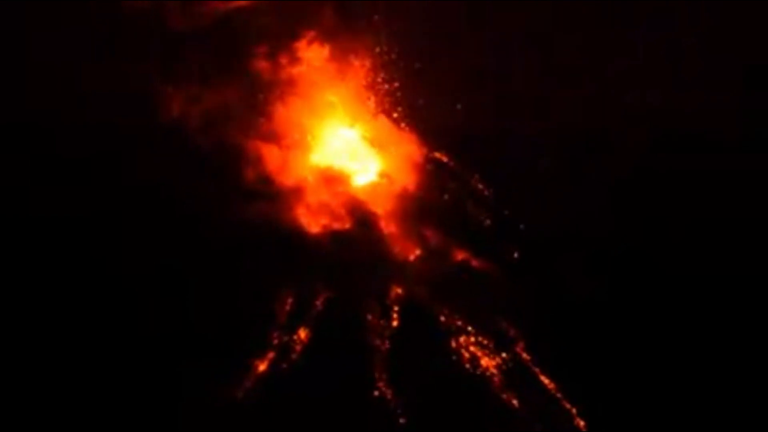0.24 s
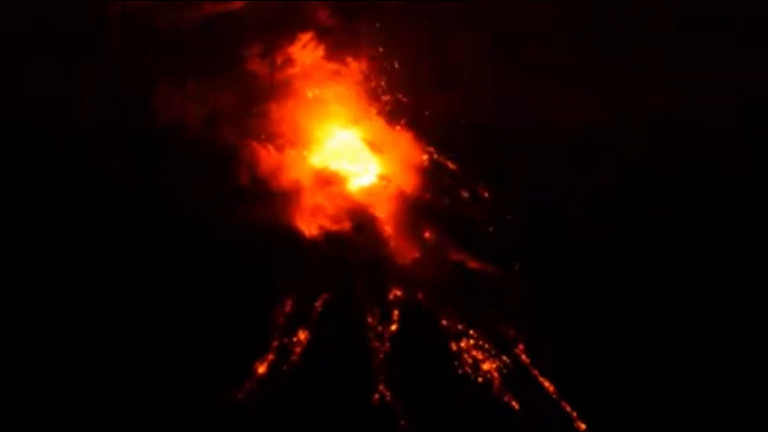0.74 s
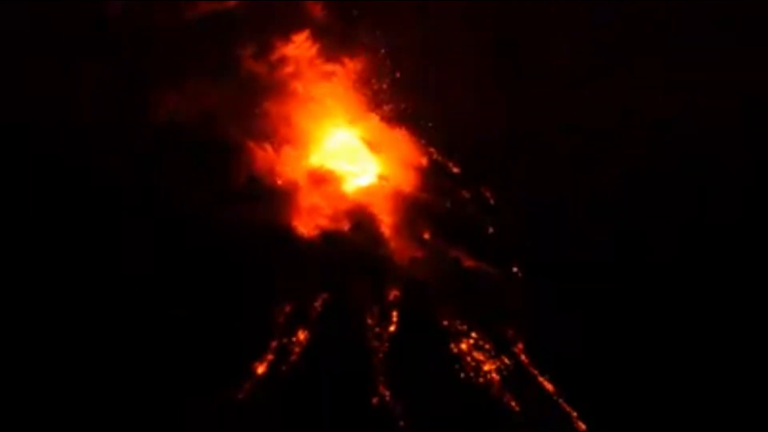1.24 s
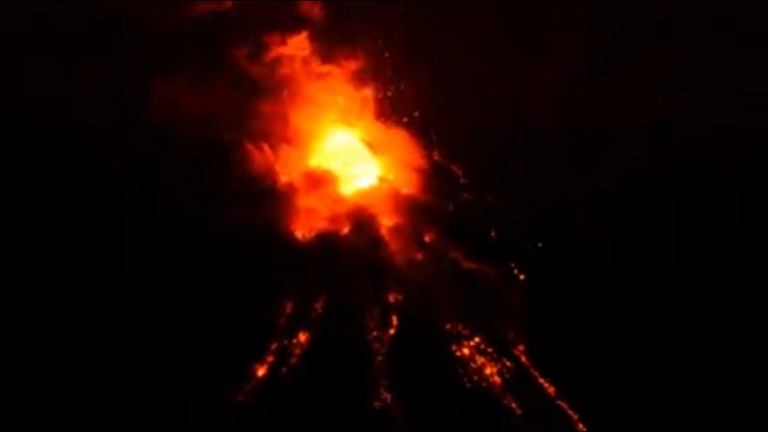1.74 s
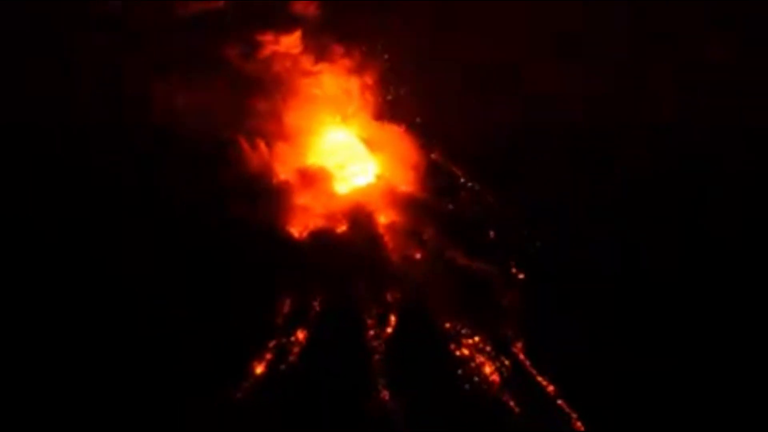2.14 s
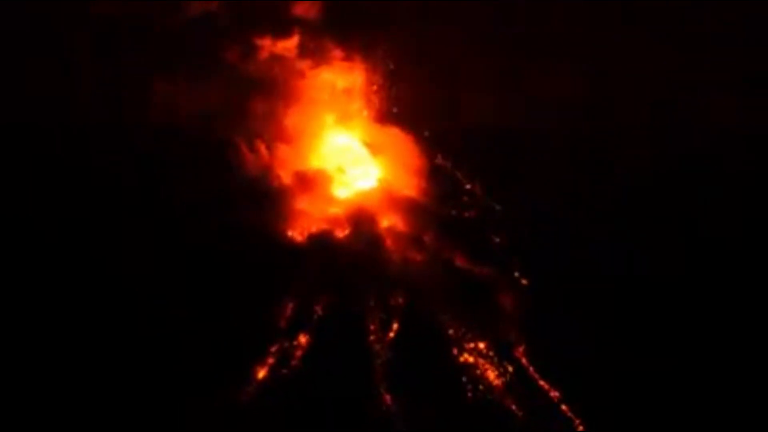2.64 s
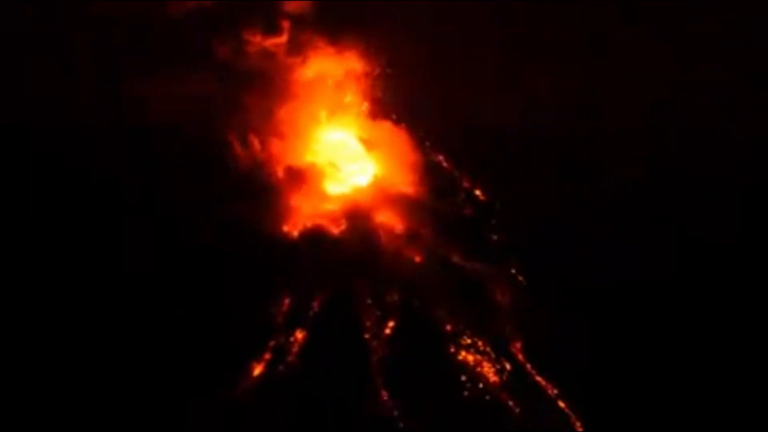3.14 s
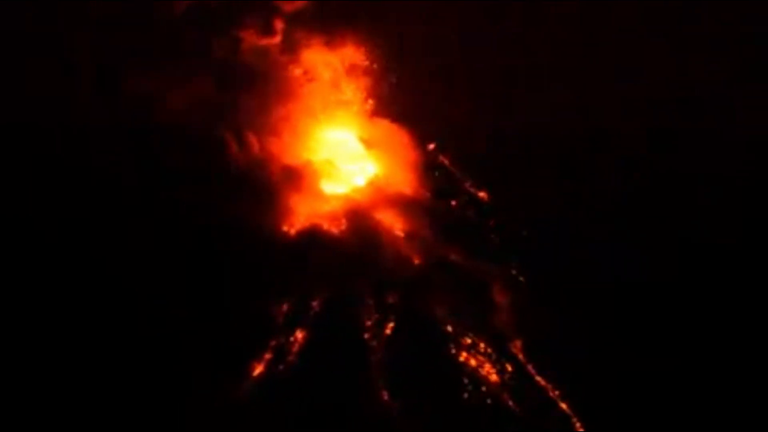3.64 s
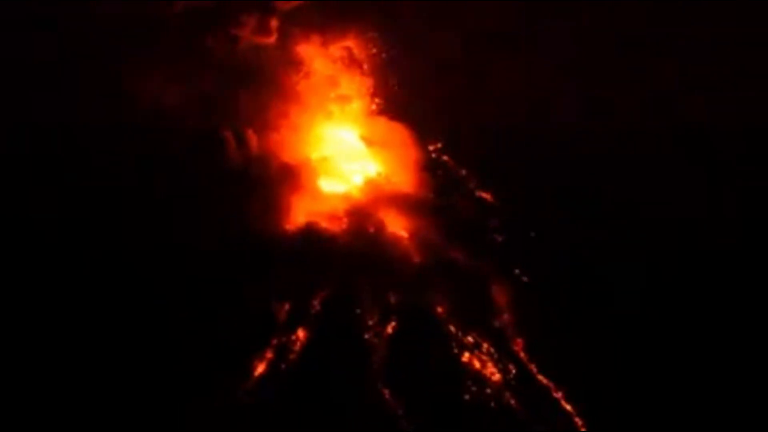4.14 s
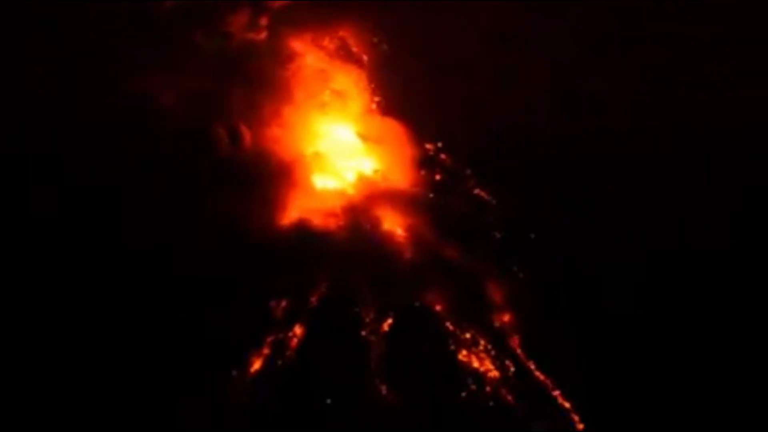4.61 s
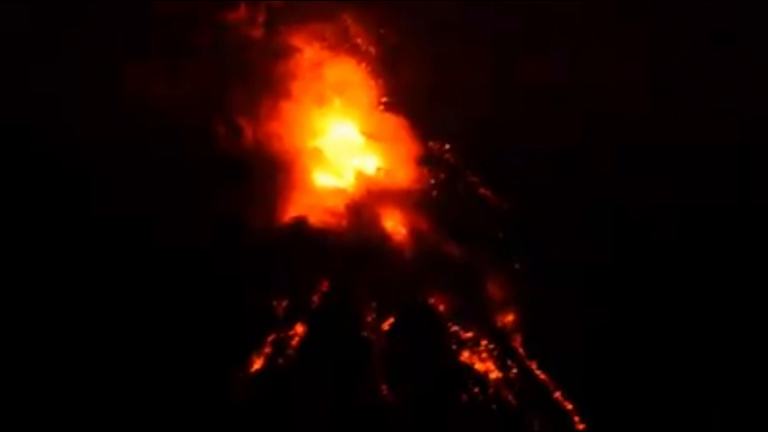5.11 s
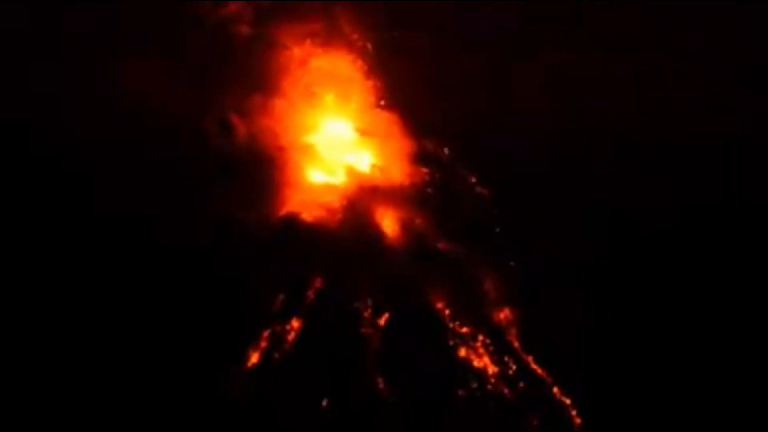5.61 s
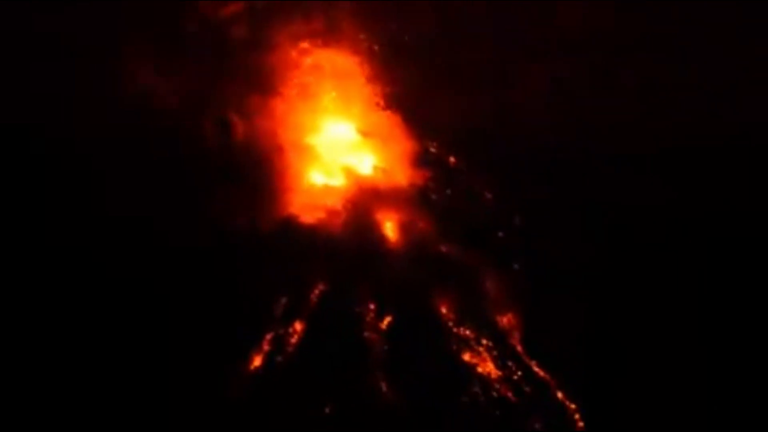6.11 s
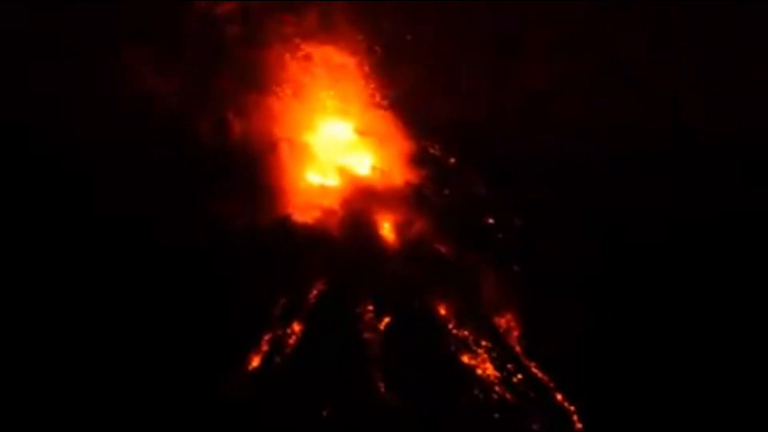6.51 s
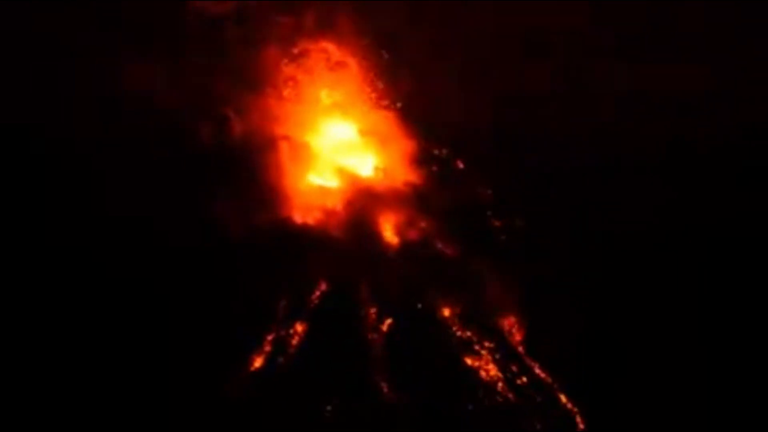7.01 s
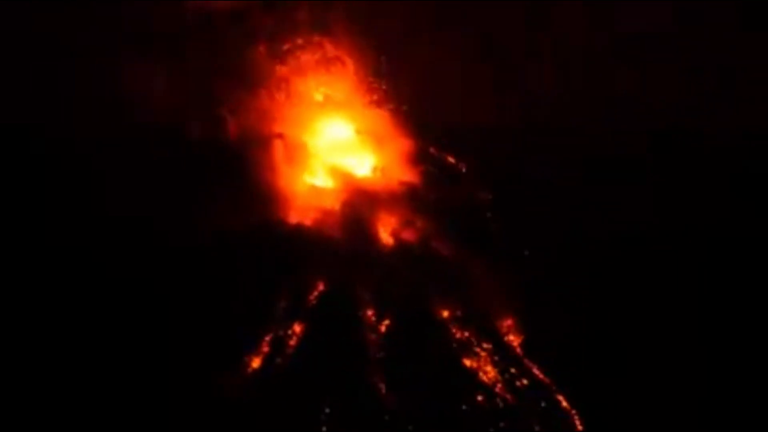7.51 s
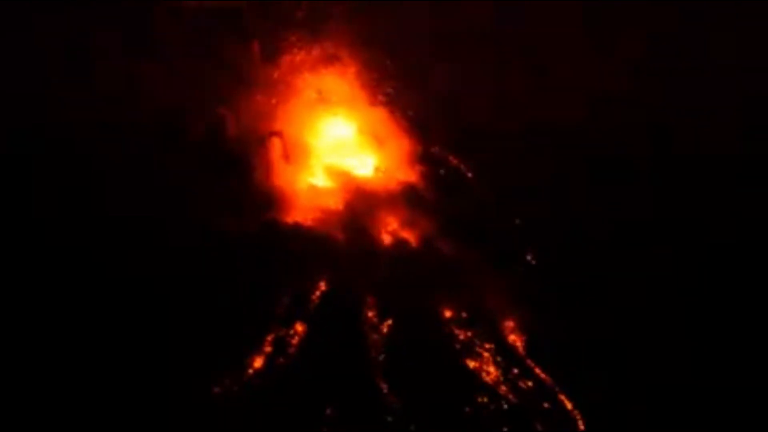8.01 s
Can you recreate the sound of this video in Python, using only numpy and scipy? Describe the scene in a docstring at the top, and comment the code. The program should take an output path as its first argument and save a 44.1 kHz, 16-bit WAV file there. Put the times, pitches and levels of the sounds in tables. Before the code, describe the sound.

Steady night eruption in open air, picked up at a distance by two closely spaced microphones, wide and slightly dull on top. Low booming surges and drumming roll without pause beneath a coarse, crackly jet roar. The airy layer starts fairly bright, thins out and leaves mostly rumble with brief muffled pops, then returns in the last two seconds as breathy gusts and clustered puffs.

```python
"""A volcano erupts steadily, heard from afar in the open through a close pair of microphone ports.
Throughout, banded noise gives a deep throbbing rumble, a low growl and a roar grained by weak shocks.
Rush and hiss, noise with finer shocks, start bright and sink away in the middle.
Short sputters of noise pop in the roar from about 1.6 s.
From about 6.3 s rush and hiss surge back in gusts, with short noise puffs clustered around them."""
import sys
import numpy as np
from scipy import signal
from scipy.fft import rfft, irfft, next_fast_len
from scipy.io import wavfile
from scipy.ndimage import uniform_filter1d

SR = 44100
rng = np.random.default_rng(int(sys.argv[2]) if len(sys.argv) > 2 else 0)


def int16_out(signal):
    """Quantize to a 16-bit WAV file."""
    q = np.round(np.clip(np.atleast_2d(signal).T, -1, 1) * 32767)
    wavfile.write(sys.argv[1], SR, q.astype(np.int16))


N = 364266

LIFT_SIGMA_S = 0.019  # bell width of rumble surges and growl thuds


def from_db(db):
    """Decibels to gain."""
    return 10 ** (np.asarray(db) / 20)


def rms_one(x):
    """Scale to unit rms."""
    return x / np.sqrt(np.mean(x ** 2) + 1e-20)


def in_time(rows):
    """Columns of a curve, interpolated to one value per sample."""
    time_s, *columns = np.transpose(rows)
    return [np.interp(np.arange(N) / SR, time_s, c) for c in columns]


def at_hz(rows, hz):
    """Columns of a spectrum, interpolated on a log-frequency axis."""
    points_hz, *columns = np.transpose(rows)
    return [np.interp(np.log(np.maximum(hz, 1)), np.log(points_hz), c) for c in columns]


def drift(rate_hz):
    """Random wandering of unit rms: two-pole low-passed noise, drawn at every 40th sample."""
    step = 40
    pole = np.exp(-2 * np.pi * step * rate_hz / SR)
    warm_up = 2000
    noise = rng.standard_normal(N // step + warm_up + 2)
    slow = signal.lfilter([1], [1, -2 * pole, pole * pole], noise)[warm_up:]
    return np.interp(np.arange(N) / step, np.arange(len(slow)), rms_one(slow))


def bell(centre_s, sigma_s):
    """Gaussian rise and fall of height 1."""
    out = np.zeros(N)
    first = max(int((centre_s - 10 * sigma_s) * SR), 0)
    last = min(int((centre_s + 10 * sigma_s) * SR), N)
    near = np.arange(first, last)
    out[near] = np.exp(-0.5 * ((near / SR - centre_s) / sigma_s) ** 2)
    return out


def bursts(rows):
    """Summed gain of bell-shaped bursts, and their gain-weighted tilt in dB per octave."""
    each = np.array([from_db(db) * bell(s, sigma_s) for s, db, sigma_s, _ in rows])
    swell = each.sum(axis=0)
    tilts_db = np.array(rows)[:, -1]
    return swell, tilts_db @ each / (swell + 1e-12)


def turbulence(shocks_per_s, shock_db, spread_db):
    """Eddy noise plus shocks of uneven strength at random moments, shock_db relative to the noise."""
    born = rng.random(N) < shocks_per_s / SR
    sizes = from_db(spread_db * np.minimum(rng.exponential(1, N), 4))
    shocks = born * sizes * rng.choice([-1, 1], N)
    return rms_one(rng.standard_normal(N) + from_db(shock_db) * rms_one(shocks))


def at_ports(direct, focus):
    """Stereo spectrum: direct sound at both ports plus scatter of the slopes, which focus (0-1) reduces."""
    # stereo field: (frequency [Hz], left minus right [dB], coherence before focus [0-1], left lead [rad])
    ports = [(20, -11.5, 0.15, -1.5), (27.8, -5, 0.8, -0.5), (42.5, 2.5, 0.77, -0.1), (57.5, 2, 0.2, -0.6),
             (69, 7, 0.45, 0.4), (94.5, -2.5, 0.43, 0.5), (179, -7.5, 0.32, 1), (266, -7, 0.22, 1.94),
             (464, -9.5, 0.16, -1.3), (920, -7.5, 0.26, -1.83), (1600, -1.1, 0.52, -2),
             (2600, 0.5, 0.44, -2.5), (4800, 0.5, 0.3, -3), (7500, 1.5, 0.3, -1.5)]
    size = next_fast_len(N, real=True)
    hz = np.fft.rfftfreq(size, 1 / SR)
    balance_db, coherence, lead_rad = at_hz(ports, hz)
    coherence = np.clip(coherence + focus * (1 - coherence), 0, 0.95)
    sides = np.array([[1], [-1]])
    scattered = rfft(rng.standard_normal((2, N)), size)
    shared = rfft(direct, size) * np.exp(0.5j * sides * lead_rad)
    pair = np.sqrt(coherence) * shared + np.sqrt(1 - coherence) * scattered
    # level out the power of the left-right mean
    mean_side_power = (from_db(balance_db) + from_db(-balance_db)) / 2
    centre_power = mean_side_power + coherence * np.cos(lead_rad)
    return hz, pair * from_db(sides * balance_db / 2) / np.sqrt(centre_power / 2)


def flow(direct, colour, pivot_hz, tilt_db, flutter_db, flutter_hz, focus=0):
    """Half-octave bands, tilted (dB/octave) and fluttering; centre rms is 1 before tilt and flutter."""
    hz, pair = at_ports(direct, focus)
    pair = pair * from_db(at_hz(colour, hz)[0])
    low_hz, high_hz = colour[0][0], colour[-1][0]
    half_octaves = 2 * np.log2(np.maximum(hz, 1) / low_hz)
    out, steady = 0, 0
    for k in range(round(2 * np.log2(high_hz / low_hz)) + 1):
        overlap = np.sin(np.pi / 2 * np.clip(1 - np.abs(half_octaves - k), 0, 1)) ** 2
        band = irfft(pair * overlap)[:, :N]
        octaves = k / 2 + np.log2(low_hz / pivot_hz)
        out = out + band * from_db(tilt_db * octaves + flutter_db * drift(flutter_hz))
        steady = steady + band
    return out / np.std(steady.mean(axis=0))


def held(x, evenness, window_s=0.082):
    """Sustained outflow: evenness (0-1) flattens the short-term power; the centre has rms 1."""
    size = int(window_s * SR)
    power = uniform_filter1d(np.mean(x ** 2, axis=0), size=size)
    power = uniform_filter1d(power, size=size // 2)
    x = x / power ** (np.clip(evenness, 0, 1) / 2)
    return x / np.std(x.mean(axis=0))


def gusts():
    """Gust gain and tilt in dB per octave: each breaks in bright, swells duller, holds and fades."""
    # gusts: (start [s], peak before layer gains [dB], swell [s], hold [s], tilt after the front [dB/octave])
    gust_rows = [(6.279, -65.5, .05, .2, 3), (6.476, -62.5, 0.064, 0.65, -2),
                 (6.85, -63.5, 0.11, .08, -1.5), (7.349, -55.5, 0.14, 0.76, 1.5)]
    attack_s, swell_rise_db, fade_db_per_s = 0.042, 14.5, 20
    front_tilt_db = 7.5  # extra dB per octave at the start
    strength, weighted_db = 0, 0
    for start_s, peak_db, swell_s, hold_s, tilt_db in gust_rows:
        age_s = np.maximum(np.arange(N) / SR - start_s, 0)
        to_come = np.maximum(1 - age_s / swell_s, 0)
        fading_s = np.maximum(age_s - swell_s - hold_s, 0)
        below_db = swell_rise_db * to_come + fade_db_per_s * fading_s
        gust = np.minimum(age_s / attack_s, 1) * from_db(peak_db - below_db)
        strength = strength + gust
        weighted_db = weighted_db + gust * (tilt_db + front_tilt_db * to_come ** 2)
    return strength, weighted_db / (strength + 1e-12)


def puffs():
    """Short puffs of gas: shock-grained noise in bell bursts, hardly scattered between the ports."""
    # puffs: (crest time [s], crest level before tilt and flutter [dB], bell sigma [s], tilt [dB/octave])
    puff_rows = [(0.27, -52.5, 0.044, -4), (1.2, -58, 0.1, -3), (3.98, -62, .06, -9),
                 (5.48, -57, .05, -10.5), (5.95, -58, 0.017, -0.5), (6.315, -55.5, .028, 4.5),
                 (6.44, -58, 0.038, 3.5), (6.58, -58, 0.062, 2.5), (6.69, -55, 0.032, -2),
                 (6.78, -49.5, 0.028, 1), (6.87, -50.5, 0.023, -0.5), (7.44, -51, .035, 6.5),
                 (7.53, -59, 0.015, 0), (7.61, -63, .02, 0), (7.78, -51.5, 0.052, 4),
                 (7.89, -57, 0.021, -2)]
    # spectrum: (frequency [Hz], relative density [dB])
    puff_colour = [(1350, 0.5), (1900, 2.5), (2700, -4.5), (4000, -18), (5600, -22), (7600, -27.5),
                   (9000, -41)]
    swell, tilt_db = bursts(puff_rows)
    source = turbulence(shocks_per_s=370, shock_db=-0.5, spread_db=4.5)
    return swell * flow(source, puff_colour, 2200, tilt_db, flutter_db=3.5, flutter_hz=30, focus=0.85)


def sputters():
    """Shock clusters smeared by distance: noise in dull or bright bell bursts a few milliseconds long."""
    # sputters: (crest time [s], crest level before tilt and flutter [dB], bell sigma [s], tilt [dB/octave])
    sputter_rows = [(1.62, -40, 0.0036, -7), (1.731, -43, .004, -7), (1.881, -41, 0.0057, -2),
                    (1.972, -42, .0025, -6), (2.079, -38.5, 0.0032, -5.5), (2.582, -41, .005, -4),
                    (2.664, -40, 0.0054, -8), (3.072, -40, 0.0036, -6), (3.102, -41, 0.0038, -3),
                    (3.218, -43, 0.0043, -1), (4.04, -44.5, 0.0077, 3), (4.142, -41, 0.0044, 1.5),
                    (4.678, -37, 0.0046, -3), (5.112, -40.5, 0.0048, -10), (5.596, -43.5, 0.0032, 5.5),
                    (5.849, -38, 0.0025, -10), (6.161, -43, 0.0061, 2), (6.26, -36.5, 0.0024, -6),
                    (6.424, -39.5, 0.0035, -10), (7.055, -42.5, 0.0062, 0), (7.489, -40, 0.0047, -9)]
    # spectrum: (frequency [Hz], relative density [dB])
    sputter_colour = [(280, 1.5), (400, 10.5), (650, 9.5), (1200, 9), (2000, -4), (2800, -23)]
    swell, tilt_db = bursts(sputter_rows)
    noise = rng.standard_normal(N)
    return swell * flow(noise, sputter_colour, 680, tilt_db, flutter_db=1.0, flutter_hz=13)


def hiss(strength, tilt_db, billow_db, gain_db):
    """Finest turbulence, scattered by the slopes: high-band noise with faint shocks of equal size."""
    # spectrum: (frequency [Hz], relative density [dB])
    hiss_colour = [(3000, 0), (4200, -5.5), (5500, -12), (7000, -18), (8200, -25), (9000, -38.5)]
    source = turbulence(shocks_per_s=290, shock_db=-9.0, spread_db=0.0)
    air = flow(source, hiss_colour, 3800, tilt_db, flutter_db=1.68, flutter_hz=25)
    return strength * from_db(gain_db + billow_db * drift(25)) * air


def rush(gust, billow, gust_db, billow_db, gain_db, brightening=0.23):
    """Finer turbulence: billows with the roar while weak, smoother and brighter as it grows."""
    # rush without gusts: (time [s], level before gain_db [dB])
    rush_level = [(0.0, -51), (0.3, -47), (0.8, -50), (1.25, -52), (1.42, -55.5), (1.62, -53.5), (2.5, -54),
                  (3.5, -58.5), (4.1, -57), (5.1, -58), (5.5, -58), (6.2, -55.5)]
    # spectrum: (frequency [Hz], relative density [dB])
    rush_colour = [(1500, 3), (2100, 2), (2700, -3), (3100, -11)]
    lag_s = 0.043  # the coarser rush follows the gusts more slowly
    keep = np.exp(-1 / (lag_s * SR))
    blown = from_db(gust_db) * signal.lfilter([1 - keep], [1, -keep], gust)
    level_db = 20 * np.log10(np.hypot(from_db(in_time(rush_level)[0]), blown))
    source = turbulence(shocks_per_s=360, shock_db=1.5, spread_db=2.5)
    surge_db = level_db - level_db.mean()
    gas = flow(source, rush_colour, 2200, brightening * surge_db, flutter_db=1.72, flutter_hz=22)
    billowing_db = billow_db * from_db(-surge_db) * billow
    return from_db(level_db + gain_db + billowing_db) * gas


def growl(deepening, gain_db):
    """Middling eddies between rumble and roar, with soft thuds and lulls: deeper as they grow louder."""
    # growl: (time [s], level before thuds and gain_db [dB])
    growl_level = [(0.0, -44.5), (0.25, -42), (0.6, -46), (1.55, -45.5), (2.3, -46), (2.95, -47),
                   (3.25, -45.5), (4.25, -48.5), (4.6, -47), (5.1, -47), (6.2, -45), (6.6, -43.5),
                   (7.15, -44.5), (7.35, -43.5), (8.0, -40.5), (8.25, -44)]
    # thuds and lulls: (centre [s], lift [dB])
    thuds = [(0.02, -5.5), (1.51, 5.5), (2.22, 8), (3.27, 2.5), (4.58, 4), (6.0, 0), (6.07, -3.5),
             (7.38, 7), (7.6, 5.5), (7.78, -6), (7.98, 1.5)]
    # spectrum: (frequency [Hz], relative density [dB])
    growl_colour = [(150, -0.5), (200, -5), (240, -3.5)]
    thud_db = sum(lift_db * bell(s, LIFT_SIGMA_S) for s, lift_db in thuds)
    level_db = in_time(growl_level)[0] + thud_db
    tilt_db = -deepening * (level_db - level_db.mean())
    eddies = flow(rng.standard_normal(N), growl_colour, 180, tilt_db, flutter_db=1.0, flutter_hz=21)
    return from_db(level_db + gain_db) * held(eddies, evenness=0.66)


def roar(level_db, tilt_db, billow, billow_db, gain_db):
    """Jet mixing noise, grained by weak shocks, billowing as a whole, now deeper and now brighter."""
    # spectrum: (frequency [Hz], relative density [dB])
    roar_colour = [(300, -5.5), (420, -8), (620, -8.5), (900, -11), (1350, -15), (1750, -24)]
    source = turbulence(shocks_per_s=300, shock_db=-2.5, spread_db=2.5)
    jet = flow(source, roar_colour, 550, tilt_db, flutter_db=1.5, flutter_hz=23)
    return from_db(level_db + gain_db + billow_db * billow) * held(jet, evenness=0.62, window_s=0.065)


def rumble(boom_db, drum_db, tilt_db, gain_db):
    """The largest eddies boom, smaller ones drum above them: low noise split in two, each surging."""
    # spectrum: (frequency [Hz], relative density [dB])
    rumble_colour = [(12, -23), (20, -10), (31, 2), (46, -3.5), (60, -9), (80, -10.5), (110, -19),
                     (150, -32)]
    # surges and lulls: (centre [s], boom lift [dB], drumming lift [dB])
    surges = [(0.05, 0.5, 3.5), (0.11, 5, 3), (0.21, -6, -5), (0.3, -16, -2.5), (0.4, 7, -2),
              (0.48, 4.5, -2), (0.94, 4.5, -4.5), (1.12, 7, -6), (1.48, -5, -2), (1.81, 7.5, 2),
              (1.87, -15, -6), (1.94, 4.5, -5), (2.02, -5, -0.5), (2.17, 9.5, 5.5), (2.52, -6, 2.5),
              (2.61, 10.5, 4), (2.67, 4.5, 1), (2.73, -11, 0), (3.18, 12.5, -4), (3.37, 9, -8),
              (3.635, 9.5, 5), (3.82, -3, 4), (3.9, 12, -0.5), (4.11, 6, 5.5), (4.42, -10, -2),
              (4.58, 3, 3), (4.82, 9, 3), (4.94, 10.5, -1.5), (5.15, 6, -4), (5.3, 7, 0), (5.78, 4, -1.5),
              (5.845, 7, -2.5), (5.93, -14, -9), (6.4, -2, 2.5), (6.645, 2.5, 1.5), (6.83, -12, -4),
              (7.05, 8, 3), (7.195, 7, -4), (7.39, 3, 2), (7.65, 2, 3.5), (7.78, 7, -1), (8.09, 5, 0.5),
              (8.18, -9, -1)]
    boom_top_hz = 52.6
    throb_db, throb_rate_hz = 0.04, 14
    eddies = flow(rng.standard_normal(N), rumble_colour, 42, tilt_db, flutter_db=0.34, flutter_hz=3.0)
    low_pass = signal.butter(4, boom_top_hz, fs=SR, output="sos")
    deep = signal.sosfiltfilt(low_pass, eddies)
    boom_lift_db, drum_lift_db = sum(np.outer(lifts_db, bell(s, LIFT_SIGMA_S)) for s, *lifts_db in surges)
    boom = from_db(boom_db + boom_lift_db) * held(deep, evenness=0.94)
    drum = from_db(drum_db + drum_lift_db) * held(eddies - deep, evenness=0.54)
    return from_db(gain_db + throb_db * drift(throb_rate_hz)) * (boom + drum)


def scene():
    """All sizes of turbulence together, from the boom to the hiss."""
    # fountain, levels before layer gains and lifts:
    # (time [s], boom [dB], drumming [dB], roar [dB], roar tilt [dB/octave])
    fountain = [(0.0, -27.5, -33, -41.0, 0), (1.1, -30, -31, -41.5, 0), (1.5, -31, -31.5, -41.5, -1.8),
                (2.1, -28, -34.5, -43.5, -1.5), (2.35, -33, -35, -42.5, -0.3), (2.9, -34, -39, -42.5, 0),
                (3.25, -32.5, -33.5, -44, -0.1), (3.65, -32.5, -35, -43.5, 2.4),
                (4.3, -34.5, -39, -42.5, 1.3), (4.6, -33, -34, -42, 1.1), (5.35, -30.5, -36, -42.5, 1.5),
                (5.9, -32.5, -33, -40.5, 0.5), (6.45, -28.5, -33.5, -41, 1),
                (7.15, -27.5, -29.5, -40, -0.8), (7.6, -28, -33, -39.5, -0.5),
                (8.25, -30, -30.5, -39.5, -0.5)]
    # hiss without gusts: (time [s], level before gain_db [dB], tilt [dB/octave])
    hiss_level = [(0.0, -57.5, 1), (0.3, -58, 0.5), (1.25, -62.5, -1.5), (1.65, -62, 5), (2.5, -61.5, 2),
                  (3.5, -69, 1), (4.5, -72.5, -4), (5.3, -68.5, 2), (6.2, -72, 4.5)]
    # swells and lulls of the jet: (centre [s], roar lift [dB], rush lift [dB], bell sigma [s])
    swells = [(0.254, 2, -2, 0.04), (1.61, 0.5, 3, .04), (2.563, 1, -0.5, 0.047), (2.876, -2.5, 1, 0.043),
              (3.145, 2.5, 2.5, .06), (3.55, -1, -2, 0.063), (4.08, 0.6, -1, .09), (4.67, 0.3, 3, 0.06),
              (5.494, 0.9, 2, 0.045), (5.798, 0, 0.5, 0.073), (6.065, -1.5, 1.5, 0.018),
              (6.76, 0.5, -3.5, 0.072), (6.88, -1.5, 2.5, 0.044), (7.03, 0.5, 3.3, 0.043),
              (7.76, 0.5, -1, 0.05)]
    boom_db, drum_db, roar_db, roar_tilt_db = in_time(fountain)
    gust, gust_tilt_db = gusts()
    hiss_db, hiss_tilt_db = in_time(hiss_level)
    billow = 1.4 * np.tanh(drift(40))  # shared by roar and rush
    lifts = sum(np.outer(lifts_db, bell(s, sigma_s)) for s, *lifts_db, sigma_s in swells)
    roar_swell, rush_swell = from_db(lifts)
    return (rumble(boom_db, drum_db, tilt_db=0.5, gain_db=-0.9)
            + growl(deepening=1.1, gain_db=-0.28)
            + roar_swell * roar(roar_db, roar_tilt_db, billow, billow_db=0.85, gain_db=-2.5)
            + rush_swell * rush(gust, billow, gust_db=7.0, billow_db=0.84, gain_db=-1.64)
            + hiss(from_db(hiss_db), hiss_tilt_db, billow_db=0.5, gain_db=-0.2)
            + hiss(gust, gust_tilt_db, billow_db=0.9, gain_db=0.3)
            + sputters()
            + puffs())


def record(dry):
    """The recorder cuts the top with a steep elliptic low-pass; short fades avoid clicks at the ends."""
    cutoff_hz, ripple_db, stop_db, fade_s = 9500, 0.1, 70, 0.005
    to_nearest_end = np.minimum(np.arange(N), np.arange(N)[::-1])
    fade = np.minimum(to_nearest_end / (fade_s * SR), 1)
    low_pass = signal.ellip(10, ripple_db, stop_db, cutoff_hz, fs=SR, output="sos")
    return fade * signal.sosfilt(low_pass, dry)


dry = scene()
out = record(dry)
int16_out(out)
```